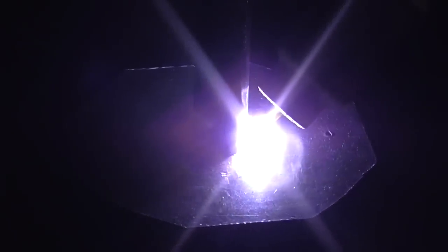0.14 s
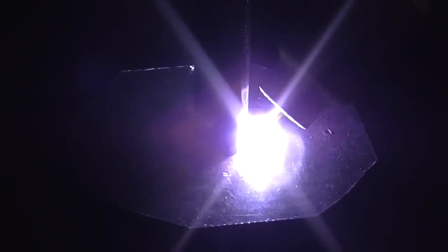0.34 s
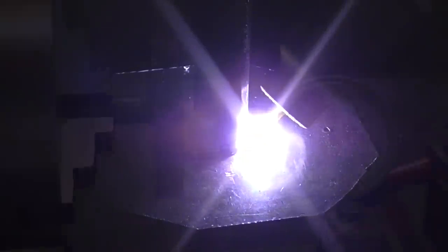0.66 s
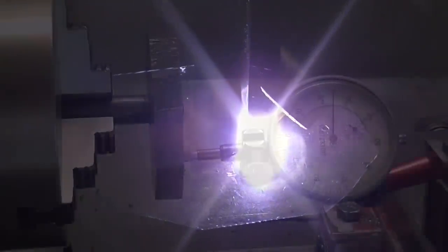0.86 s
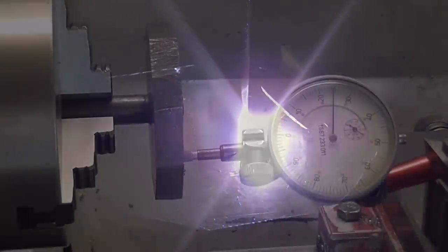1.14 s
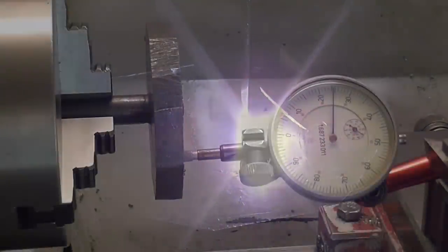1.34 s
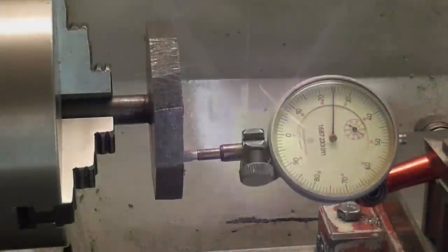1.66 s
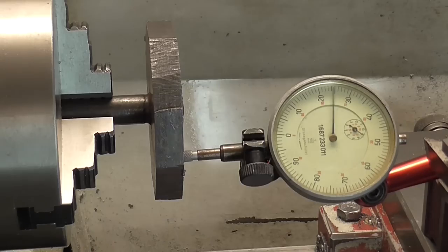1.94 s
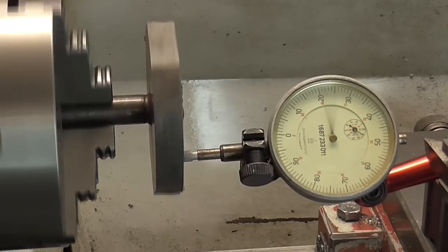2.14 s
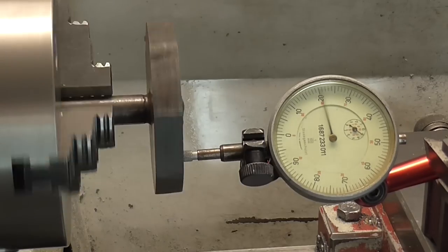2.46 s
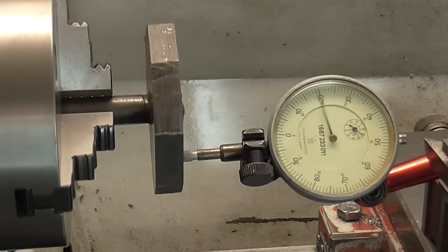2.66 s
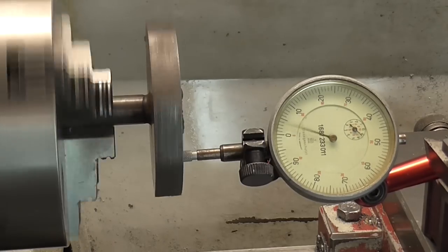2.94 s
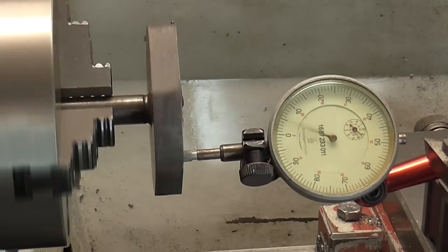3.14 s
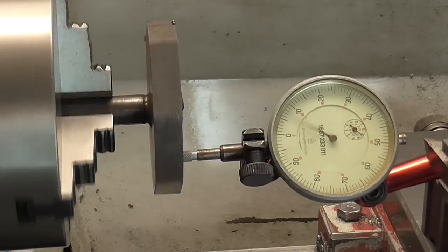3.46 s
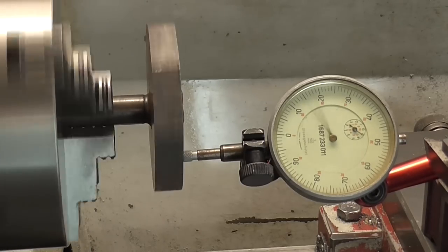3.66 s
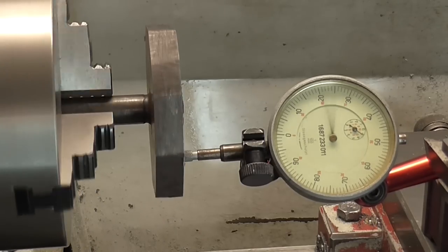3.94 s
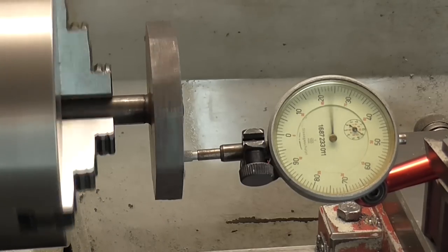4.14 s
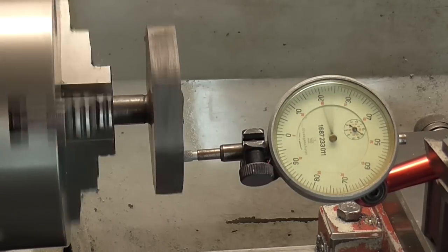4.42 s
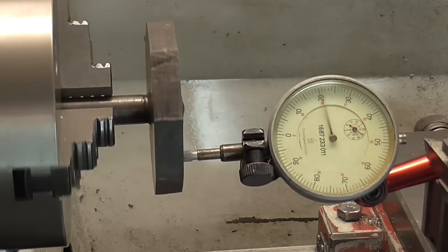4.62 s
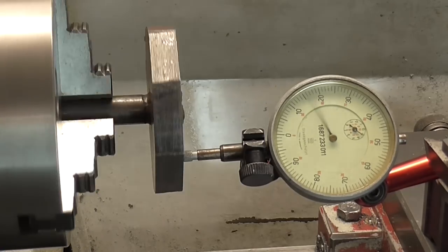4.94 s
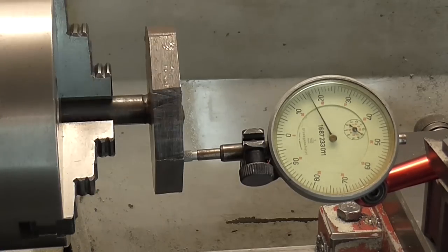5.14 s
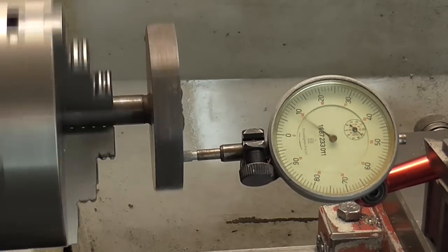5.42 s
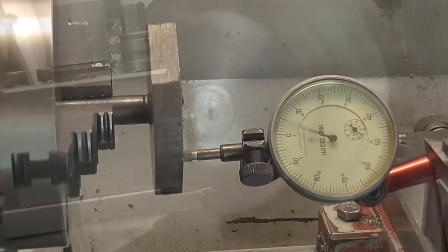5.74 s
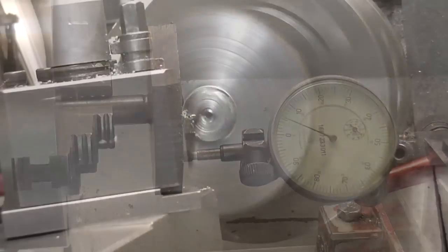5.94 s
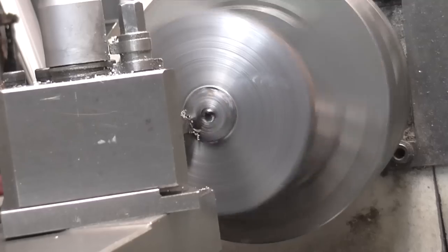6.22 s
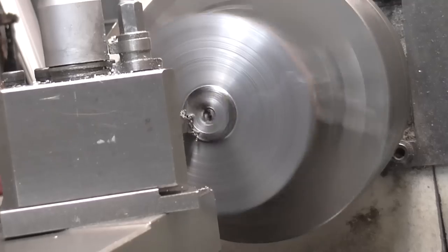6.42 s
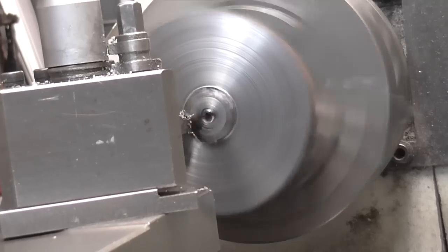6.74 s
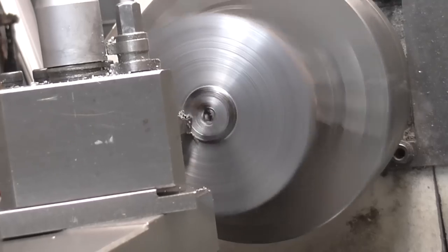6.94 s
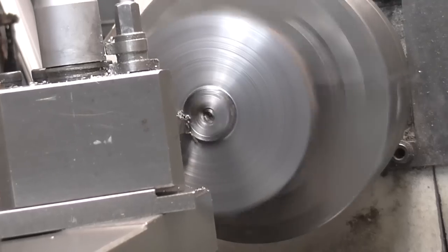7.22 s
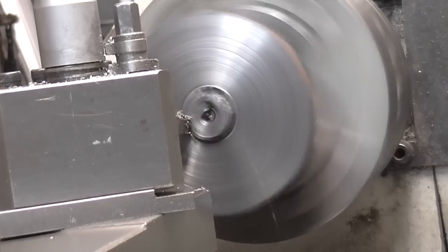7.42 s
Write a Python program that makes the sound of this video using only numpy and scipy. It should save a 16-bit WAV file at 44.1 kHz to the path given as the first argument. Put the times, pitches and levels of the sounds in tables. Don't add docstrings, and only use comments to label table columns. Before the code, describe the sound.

Close in a workshop: steady fan roar and hissing arc sink away into faint room hum. Short hand pulls on a chuck follow, each a dry toothy ratcheting with metallic ticks, rumbling bearings and faint high squeals. Finally a much louder lathe swells up facing steel, its casting throbbing irregularly, gears whining, the tool hissing, and bright chips tearing, snapping and pinging.

```python
import sys
import numpy as np
from scipy import signal
from scipy.io import wavfile
from scipy.ndimage import uniform_filter1d, map_coordinates

SR = 44100
rng = np.random.default_rng(int(sys.argv[2]) if len(sys.argv) > 2 else 0)


def pcm_store(signal):
    levels = np.round(np.clip(np.atleast_2d(signal), -1, 1) * 32767)
    wavfile.write(sys.argv[1], SR, levels.astype(np.int16).T)


def rack_gain(trim_db):
    fader = np.asarray(trim_db, float)
    return 10 ** (fader / 20)


N = 334278

# pitch in Hz, balance in dB.
HAND_PAIR = [
    [(60, 0.22), (240, 0.79), (950, 0.53), (3770, 0.92), (15000, 0.3)],
    [(60, -5), (950, -1.5), (15000, 0)],
]
LATHE_PAIR = [
    [(60, 0.25), (130, 0.96), (290, 1), (640, 0.92), (1410, 0.67), (3100, 0.71), (6820, 0.94), (15000, 0.27)],
    [(60, -0.8), (950, -1.7), (15000, -1.7)],
]
# start in seconds, length in seconds, tooth rub level in dB,
# share of the length at which the pull is hardest.
PULLS = [(2.07, 0.55, -45.5, 0.45), (2.55, 0.31, -50, 0.34), (2.79, 0.55, -45, 0.53),
         (3.24, 0.25, -52.5, 0.35), (3.54, 0.71, -43, 0.39), (4.22, 0.53, -45, 0.36),
         (4.67, 0.21, -51.5, 0.46), (4.82, 0.4, -50.5, 0.45), (5.41, 0.47, -45.5, 0.51)]
# pitch in Hz, width in Hz, level in dB.
TOOL = [(1480, 150, 0), (2010, 100, -3), (2585, 80, -5), (2800, 150, -8), (3022, 55, 0), (3280, 130, -4),
        (4850, 300, -14)]


def welder():
    # time in seconds, level in dB.
    loudness = [(0, -19), (0.195, -19.5), (0.559, -19), (1.108, -23.5), (1.312, -25.5), (1.641, -32),
                (1.726, -35), (1.806, -37.5), (1.9, -50.5)]
    pair = [
        [(60, 2.9), (240, 1.3), (950, 0.73), (3770, 0.78), (15000, 1)],
        [(60, -10), (950, 0.5), (15000, -1)],
    ]
    # pitch in Hz, level in dB per Hz.
    wash = [(29, -55), (50, -37), (103, -51), (225, -7), (506, -6.5), (550, -8), (670, -5.5), (948, -14.5),
            (1390, -12.5), (2600, -28), (3380, -89), (5720, -120)]
    # pitch in Hz, width in Hz, level in dB.
    case = [(185.5, 52, -1.5), (280, 14, -3), (381, 72, 1.5), (496.7, 23, -3), (657, 29, -9),
            (1483, 42, -16)]
    # multiple of the blade rate, level in dB against the roar.
    blades = [(1, -7.5), (3, -15), (5, -19), (6, -21.5), (7, -26)]
    # multiple of the shaft rate, level in dB against the roar.
    shaft = [(1, -28), (2, -34), (3, -32)]
    # pitch in Hz, level in dB per Hz.
    arc = [(1500, -28), (2600, -4), (4800, -0.5), (7700, -6), (8600, -14), (9700, -12), (10500, -19),
           (11300, -13), (13000, -16), (15600, -24)]
    blade_hz, shaft_hz = 226.7, 44.3

    gate, (level_db,) = curves(loudness)
    roar = rack_gain(-5.0) * noise(pair, wash) + rack_gain(-5.5) * noise(pair, modes=case)
    lines = sum(rack_gain(db) * tone(k * blade_hz, 0.00216, 2.26) for k, db in blades)
    lines = lines + sum(rack_gain(db) * tone(k * shaft_hz, 0.0062, 0.83) for k, db in shaft)
    hiss = rack_gain(-17.5) * noise(pair, arc)
    return gate * rack_gain(level_db) * (roar + lines + hiss)


def hand_pulls():
    # start in seconds, length in seconds, bearing rumble in dB.
    spins = [
        (2.057, 3.3, -47.5),
        (5.39, 0.44, -48.5),
    ]
    rise_s, fall_s, rest_db = 0.06, 0.1, -62
    spin = held([(s, length, rack_gain(db)) for s, length, db in spins], rise_s, fall_s)
    coasting = held([(s, length, 1) for s, length, _ in spins], rise_s, fall_s)
    effort = swells(PULLS, 1.4) + rack_gain(rest_db) * coasting
    push = (effort / rack_gain(-38.5) + 0.016) ** 0.13
    return gear_rub(effort) + spin * push * bearing_rumble() + tooth_ticks()


def gear_rub(effort):
    # pitch in Hz, width in Hz, level in dB.
    gearbox = [(1764, 720, 3.5), (2040, 12, -2.5), (2330, 160, -1), (3315, 53, -5), (3780, 140, -2),
               (4150, 310, -2), (4900, 150, -2.5), (5470, 150, -12), (2740, 2300, 2)]
    # pitch in Hz, level in dB per Hz.
    scrape_colour = [(1200, -6), (3000, -3), (5500, 5), (7400, -3.5), (8600, -8), (10800, -5), (11600, -8),
                     (12500, -26), (15600, -34)]
    # start in seconds, length in seconds, scrape level in dB.
    drags = [(2.3, 0.12, -78), (2.62, 0.15, -69), (3.27, 0.12, -64), (3.85, 0.16, -63), (4.0, 0.14, -68),
             (4.22, 0.09, -69), (4.98, 0.35, -67), (5.55, 0.13, -74)]
    # start in seconds, shift as a share of a tooth.
    tooth_place = [(0, .36), (2.55, .02), (3.5, .42), (3.99, .8), (4.2, .48), (4.58, .15), (4.9, .2),
                   (5.35, .95)]
    # start in seconds, length in seconds, level in dB,
    # share of the length at which it is hardest.
    shrill = [
        (2.8, .44, -51, .55),
        (3.62, .38, -50, .5),
        (2.58, .1, -55, .5),
    ]
    # pitch in Hz, width in Hz, level in dB.
    shrill_ring = [(3820, 100, -1), (4220, 280, -1)]
    teeth_per_s = 78.9

    t = np.arange(N) / SR
    since, place = np.transpose(tooth_place)
    shift = place[np.searchsorted(since, t, "right") - 1]
    cycle = (t * teeth_per_s - shift) % 1
    contact = np.exp(-cycle / 0.83) * rack_gain(2.5 * drift(48))
    rub = evened(1.9 + contact ** 2.6) * noise(HAND_PAIR, modes=gearbox, steep=1.7)
    scrape = evened(0.72 + contact ** 2.9) * noise(HAND_PAIR, scrape_colour)
    scrape = scrape + rack_gain(-2) * flank_ticks(cycle)
    drag = rack_gain(-16.5) * effort + swells(drags, 0.8)
    ringing = swells(shrill, 0.64) * evened(.5 + contact) * noise(HAND_PAIR, modes=shrill_ring)
    return rack_gain(-3.0) * effort * rub + rack_gain(4.5) * drag * scrape + ringing


def flank_ticks(cycle):
    # pitch in Hz, width in Hz, level in dB.
    flank = [(1760, 330, 2), (4780, 200, -2), (5830, 370, 0), (7050, 280, -10), (11600, 450, -16)]
    t = np.arange(900) / SR
    ring = sum(rack_gain(db) * np.exp(-np.pi * w * t) * np.sin(2 * np.pi * f * t) for f, w, db in flank)
    passing = np.diff(cycle, prepend=0) < -.5
    hits = passing * rack_gain(-5.5 * rng.standard_normal(N))
    return evened(signal.oaconvolve(hits, ring)[:N]) * rack_gain(np.array([[.5], [-.5]]))


def bearing_rumble():
    # pitch in Hz, width in Hz, level in dB.
    rumble_rings = [(241, 61, -11), (335.5, 90, -1), (458, 77, -5.5), (592, 78, -2.5), (708, 190, 1),
                    (1010, 1600, -8)]
    # pitch in Hz, level in dB against the rumble.
    housing = [(322, -13.5), (625, -11.5)]
    # pitch in Hz, start in seconds, length in seconds, level in dB.
    hums = [(478, 2.7, 0.16, -3), (705, 3.88, 0.22, -4), (620, 4.24, 0.23, -3), (478, 3.38, .18, -5),
            (615, 4.07, .09, -3), (470, 4.1, .12, -5), (320, 5.05, .13, -3), (760, 5.15, .14, -6)]
    rumble = noise(HAND_PAIR, modes=rumble_rings, patchy_db=-1.5) * rack_gain(1.7 * drift(7.8))
    rumble = rumble + rack_gain(-11) * tone(234, .003, .8)
    rumble = rumble + sum(rack_gain(db) * tone(hz, 0.01253, 5.3) for hz, db in housing)
    return rumble + sum(swells([row], 0.46) * tone(hz, 0.00402, 1.1) for hz, *row in hums)


def tooth_ticks():
    # time in
    # seconds, peak in dB, low ring in dB against the high ring.
    ticks = [(2.1038, -38, -13), (2.1297, -43, -5), (2.207, -40, 1), (2.231, -37, -9), (2.2569, -33.5, -7),
             (2.2814, -33, -11), (2.3068, -31.5, -11), (2.3647, -31.5, -7.5), (2.4939, -39, -10),
             (2.567, -47, -4), (2.6206, -43, -11), (2.8092, -45, -12), (2.8476, -43, -6), (2.9374, -43, -5),
             (2.9763, -38, -7), (3.015, -41, -11), (3.1349, -43, -2), (3.1664, -40, -5), (3.192, -33.5, -6),
             (3.5785, -43.5, -3), (3.604, -40, -4.5), (3.6298, -30, -6), (3.6554, -31, -6.5),
             (3.682, -25, -11), (3.7066, -27, -9), (3.732, -32, -9), (3.758, -26, -11), (3.8074, -33, -6),
             (3.833, -27, -10), (3.858, -37, -7), (3.8832, -30, -11), (3.9092, -25, -9),
             (3.9358, -25.5, -9), (3.9601, -34, -2), (4.0284, -41, 1), (4.2623, -39, -9),
             (4.2873, -38, -10), (4.3133, -32.5, -9), (4.337, -38, -7), (4.3636, -38, -6),
             (4.3895, -30, -10), (4.414, -36, -11), (4.4385, -39, -12), (4.4639, -34, -20),
             (4.4892, -35, -11), (4.5143, -33, -10), (4.5647, -36.5, -18), (4.7029, -38, -8),
             (4.7528, -37.5, -14), (4.7777, -45, -11), (4.9169, -44, -16), (5.0314, -37, -9),
             (5.057, -43, -4), (5.538, -45, -7), (5.5594, -43, -5), (5.5978, -38, -7), (5.6487, -38, -11),
             (5.7121, -46, -1),
             (2.3534, -41, -15), (2.3945, -37, -11), (2.4518, -45, -2), (2.5296, -44, -2),
              (2.6334, -38, -11), (2.6454, -39, -11), (3.0445, -37, -7), (3.0654, -40, -8),
              (3.0794, -39, -11), (3.1154, -40, -2), (3.2934, -47, 4), (3.3174, -43, 4), (3.9844, -48, 5),
              (4.0113, -42, 0), (4.0364, -44, 2), (4.0604, -44, 3), (4.9297, -41, -12)]
    # pitch in Hz, width in Hz, level in dB.
    tooth = [(2070, 80, -3), (2230, 170, 0), (3810, 90, -9), (4150, 140, -2), (4340, 150, 0),
             (4900, 200, -14), (5700, 300, -19)]
    lead_s = .0014
    events = [(s - lead_s, db, low + 3, -19) for s, db, low in ticks]
    return rack_gain(0.5) * knocks(events, tooth, 2900, 0.0045, 0.4, 6100, rattle=0.84)


def squeak():
    # time in seconds, pitch in Hz, level in dB.
    slip = [
        (3.608, 3420, -58),
        (3.622, 3710, -37),
        (3.68, 3400, -57),
    ]
    gate, (hz, level_db) = curves(slip)
    grain = evened(uniform_filter1d(rng.standard_normal(N), size=90))
    return gate * rack_gain(level_db) * grain * tone(hz, 0.00393)


def hand_squeals():
    # start in seconds, length in seconds, level in dB.
    lines = [
        [(2.355, .05, -62), (2.41, .07, -67), (2.87, .09, -69), (3.0, .14, -65), (3.14, .22, -72), (3.6, 0.087, -60), (3.72, .08, -64), (3.88, 0.11, -54), (4.04, .12, -73), (4.34, .2, -71), (5.52, 0.17, -70)],
        [(4.58, 0.28, -79), (2.12, 0.074, -75), (2.26, .09, -66), (2.35, 0.074, -68), (2.53, 0.11, -68), (2.87, .14, -66), (3.05, 0.088, -64), (3.14, 0.13, -69), (3.73, 0.11, -60), (3.8, .13, -62), (3.97, 0.11, -62), (4.24, .09, -73), (4.36, 0.1, -63), (4.95, .1, -74), (5.57, 0.13, -65)],
    ]
    pitches_hz = (9835, 10175)
    # start in seconds, length in seconds, level in dB.
    pips = [
        (3.71, .03, -62),
        (4.39, .04, -60),
    ]
    links = rack_gain(-32) * swells(PULLS, .6)
    return squeals(lines, pitches_hz, links) + swells(pips) * tone(9450, .003)


def cut_squeals():
    # start in seconds, length in seconds, level in dB.
    lines = [
        [(5.9, 1.6, -70), (6.4, .11, -58), (6.54, 0.093, -57), (6.77, 0.057, -56), (6.91, 0.12, -46), (7.11, 0.12, -52), (7.4, .07, -57), (7.48, 0.06, -57)],
        [(5.9, 1.4, -63), (6.51, 0.12, -54), (7.24, 0.056, -55), (7.49, .1, -63)],
    ]
    pitches_hz = (9646, 9975)
    return squeals(lines, pitches_hz)


def squeals(tables, pitches_hz, links=0):
    flickers = [(swells(rows, 1.4) + links) * rack_gain(2 * drift(30)) for rows in tables]
    return sum(flicker * tone(hz, 0.00051) for hz, flicker in zip(pitches_hz, flickers))


def lathe():
    # start in seconds, length in seconds, surge in dB over the steady cut.
    surges = [(5.755, 0.021, 10), (5.875, 0.048, 6.5), (5.95, 0.042, 5.5), (6.01, 0.04, 5.5),
              (6.148, 0.042, 7), (6.24, 0.076, 7), (6.33, 0.051, 1.5), (6.385, 0.11, 5.5),
              (6.485, 0.036, 5), (6.517, 0.065, 4.5), (6.603, 0.052, 6.5), (6.66, 0.043, 4.5),
              (6.71, 0.089, 4.5), (6.915, 0.052, 6), (6.985, 0.089, 3.5), (7.06, 0.032, 8.5),
              (7.132, 0.03, 6.5), (7.175, 0.012, 20), (7.228, 0.058, 4), (7.388, 0.069, 6.5),
              (7.5, .06, 2.5), (7.56, 0.038, 0.5)]
    # start in seconds, length in seconds, level in dB.
    hard_spot = [
        (6.83, 0.17, 1.5),
    ]
    # pitch in Hz, level in dB per Hz.
    roar_colour = [(70, -57), (110, -36), (200, -9.5), (760, -8), (1460, -7.5), (2050, -16), (2300, -25),
                   (3000, -23.5), (5000, -78)]
    # pitch in Hz, width in Hz, level in dB.
    roar_rings = [(940, 50, -5), (1460, 220, -1), (2010, 70, -7)]
    # pitch in Hz, level in dB per Hz.
    hiss_colour = [(1290, -16), (2200, -24), (2770, -1), (3000, 0.5), (3510, 0.5), (4000, 0), (5070, 3.5),
                   (5540, -1), (9660, -5), (12500, -9.5), (15500, -28)]
    # pitch in Hz, level in dB.
    whine_tones = [(468, -29), (868, -39.5), (921, -39), (947, -43.5), (1045, -48), (1147, -44),
                   (1248, -37.5)]
    start_s, full_s = 5.693, 6.114

    fade = np.clip((np.arange(N) / SR - start_s) / (full_s - start_s), 0, 1) ** 1.08
    bite_db = held(surges, 0.0043, 0.02)
    chips = evened(2.0 + crackle(110, .003, 2.0)) * rack_gain(held(hard_spot, 0.02, 0.033))
    roar = rack_gain(2) * noise(LATHE_PAIR, roar_colour) + rack_gain(-4.5) * noise(LATHE_PAIR, modes=roar_rings)
    hiss = rack_gain(-38.5 + 0.2 * bite_db) * chips * noise(LATHE_PAIR, hiss_colour)
    whine = sum(rack_gain(db) * tone(hz, 0.00127, 2.5) for hz, db in whine_tones)
    whine = whine + rack_gain(-44) * tone(99.6, .001, 1.0)
    body = casting_drone(bite_db) + rack_gain(-27 + 0.24 * bite_db) * chips ** 1.09 * roar
    low_cut = signal.butter(4, 85, "high", fs=SR, output="sos")
    body = signal.sosfilt(low_cut, body)
    return fade * (body + hiss + whine) + rack_gain(-3.5) * chip_tears() + chip_clanks()


def casting_drone(bite_db):
    # pitch in Hz, width in Hz, level in dB.
    bed_ring = [(345, 26, 0)]
    casting = [(183.4, 16.3, -5.5), (245.7, 15, 0.5), (401.3, 13.2, -3.5), (464, 8.6, -4.5), (556, 24, -13),
               (664, 64, -4.5)]
    upper_ring = [(668, 22.3, 0)]
    # start in seconds, length in seconds, dB over its steady ring.
    answers = [(6.08, 0.058, 5.5), (6.19, 0.073, 1), (6.36, 0.042, 8), (6.5, 0.073, 7), (6.77, 0.054, 8.5),
               (6.93, 0.046, 7.5), (6.99, 0.033, 10), (7.06, 0.027, 17.5), (7.14, 0.059, 13),
               (7.49, 0.038, 12), (7.552, 0.046, 14)]
    bed = steadied(noise(LATHE_PAIR, modes=bed_ring, steep=2.7), 0.02, 0.71)
    rings = steadied(noise(LATHE_PAIR, modes=casting, patchy_db=2.0, steep=1.36), 0.019, 0.12)
    bell = steadied(noise(LATHE_PAIR, modes=upper_ring), 0.043, 1.0)
    drone = rack_gain(-21) * (rack_gain(1.6 * bite_db - 2.0) * bed + rack_gain(0.59 * bite_db - 0.5) * rings)
    return drone + rack_gain(-29 + held(answers, 0.0043, 0.02)) * bell


def chip_tears():
    # time in seconds, peak in dB, pitch in Hz.
    tear_list = [(5.798, -34, 4330), (5.8477, -26, 7280), (5.9163, -19.5, 7100), (5.9704, -33, 4700),
                 (6.01, -23, 5110), (6.0902, -28, 5210), (6.1301, -23, 5090), (6.161, -38, 4480),
                 (6.4099, -23, 6520), (6.4369, -22, 7440), (6.4847, -26, 4480), (6.5451, -22, 5840),
                 (6.588, -26, 4320), (6.605, -17, 6740), (6.642, -21, 6620), (6.8418, -18, 6520),
                 (6.8937, -18, 4480), (6.9387, -18, 5220), (7.045, -25, 4880), (7.0829, -36, 4720),
                 (7.1303, -39, 4530), (7.1972, -29, 4540), (7.2186, -23, 5240), (7.251, -21, 5910),
                 (7.325, -19, 5050), (7.3762, -36, 5350), (7.3892, -27, 5490), (7.4102, -31, 4470),
                 (7.4426, -25, 5190)]
    decay_s, breadth, apart = 0.0047, 0.53, 0.52
    t, out = np.arange(1600) / SR, np.zeros((2, N + 1600))
    for s, peak_db, hz in tear_list:
        puff = rng.standard_normal(1600) + apart * rng.standard_normal((2, 1600))
        puff = puff * np.minimum(t / .001, 1) * np.exp(-t / decay_s)
        ring = signal.iirpeak(hz, 1 / breadth, SR)
        puff = signal.lfilter(*ring, signal.lfilter(*ring, puff))
        at = round(s * SR)
        out[:, at:at + 1600] += rack_gain(peak_db) * puff / abs(puff).max()
    return out[:, :N]


def chip_clanks():
    # time in seconds, ping peak in dB, low ring in dB over the ping.
    clanks = [(5.8356, -37, 16), (5.8551, -36, 15), (5.9145, -25.5, 4), (5.9714, -28, 6), (6.0077, -24, 13),
              (6.0836, -30.5, 1), (6.126, -30, 9), (6.1534, -33, 17), (6.2038, -31, 12), (6.2647, -30, 15),
              (6.3021, -36, 1), (6.3235, -28, 14), (6.3644, -24.5, 12), (6.4094, -30, -1), (6.4388, -23, 8),
              (6.4867, -26, 2), (6.5231, -25, 4), (6.5604, -34, 6), (6.5864, -28, 10), (6.6044, -27, 14),
              (6.6423, -25.5, 13), (6.6744, -30, 19), (6.7231, -30, 11), (6.7724, -45, 0),
              (6.8354, -26.5, 3), (6.8838, -31, 5), (6.8944, -25.5, 22.5), (6.9042, -30, -1),
              (6.9341, -25, 15), (6.9651, -30, 9), (6.9945, -28, 15), (7.0419, -37, -10), (7.0843, -27, 0),
              (7.1417, -20, -6), (7.1761, -27, 9), (7.2, -23, 4), (7.2529, -31, 13), (7.2913, -32, 12),
              (7.3262, -18, 7), (7.3781, -33, 1), (7.415, -27, 8), (7.444, -16.5, 4), (7.5014, -32, 17),
              (7.5313, -30, 3)]
    events = [(s - .001, db - 1.0, low - 3, -12) for s, db, low in clanks]
    return knocks(events, TOOL, 2300, 0.0043, 0.44, rattle=1.0, soft_s=0.00083)


def swarf_snaps():
    # time in seconds, peak in dB.
    snaps = [(5.8727, -42), (5.953, -38), (6.0822, -38), (6.1106, -32), (6.4718, -34), (6.5456, -32),
             (6.605, -26), (6.6354, -35), (6.7596, -34), (6.9392, -30), (7.1577, -36), (7.2111, -34),
             (7.2406, -33), (7.3892, -42)]
    events = [(s, db - 19.0, 0, 20) for s, db in snaps]
    return knocks(events, TOOL, 2300, 0.0021, 0.46, 10800, rattle=3.3)


def idle_workshop():
    # pitch in Hz, level in dB per Hz.
    room = [(30, -45), (65, 5.5), (130, 1), (400, -6.5), (700, -6), (1850, -14.5), (2030, 0), (2400, -8),
            (2700, -20), (4400, -14), (8000, -17.5), (15600, -19)]
    return rack_gain(-60) * noise(HAND_PAIR, room, patchy_db=.8)


def noise(pair, spectrum=None, modes=None, patchy_db=1.5, steep=2):
    frames, hz = N // 512 + 6, np.fft.rfftfreq(2048, 1 / SR)
    a, b, c, d, patches = rng.standard_normal((frames, 1025, 5)).T
    patches = evened(uniform_filter1d(uniform_filter1d(patches, size=12, axis=0), size=4, axis=1))
    if modes is None:
        colour = rack_gain(read(spectrum, hz))
    else:
        power = sum(rack_gain(db) ** 2 / w / (1 + (2 * (hz - f) / w) ** 2) ** steep for f, w, db in modes)
        colour = np.sqrt(power) / (1 + (110 / (hz + 1)) ** 4)
    same = np.clip(read(pair[0], hz), -1, 1)[:, None]
    left = a + 1j * b
    right = same * left + np.sqrt(1 - same ** 2) * (c + 1j * d)
    lean = rack_gain(read(pair[1], hz) / 2)[:, None]
    z = np.array([left * lean, right / lean]) * colour[:, None] * rack_gain(patchy_db * patches)
    return evened(signal.istft(z, nperseg=2048, noverlap=1536)[1][:, :N])


def tone(hz, waver, wobble_db=0.5, lean_db=-1.0):
    turns = np.cumsum(hz * (1 + waver * drift(6))) / SR + rng.random()
    sides = rack_gain(np.array([[.5], [-.5]]) * lean_db)
    return np.sqrt(2) * np.sin(2 * np.pi * turns) * rack_gain(wobble_db * drift(7.9)) * sides


def knocks(events, modes, split_hz, blow_s, apart, edge_hz=7200, rattle=.25, soft_s=0.00081):
    t, out = np.arange(2600) / SR, np.zeros((2, N + 5200))
    soft_start = 1 - np.exp(-t / soft_s)
    ring = [rack_gain(db) * np.exp(-np.pi * w * t) * soft_start * np.sin(2 * np.pi * f * t) for f, w, db in modes]
    low = sum(r for r, m in zip(ring, modes) if m[0] < split_hz)
    high = sum(r for r, m in zip(ring, modes) if m[0] >= split_hz)
    edge = t * np.exp(-t * edge_hz / 1.2) * np.sin(2 * np.pi * edge_hz * t)
    for s, peak_db, low_db, edge_db in events:
        shared, own = rng.standard_normal(2600), rng.standard_normal((2, 2600))
        tail = rattle * (shared + apart * own) * np.exp(-t / blow_s) / np.sqrt(blow_s * SR)
        blow = (t == 0) + tail
        parts = [signal.fftconvolve(blow, k[None])[:, :2600] for k in (high, low, edge)]
        sound = sum(rack_gain(db) * p / abs(p).max() for p, db in zip(parts, (0, low_db, edge_db)))
        at = round(s * SR)
        out[:, at:at + 2600] += rack_gain(peak_db) * sound
    return out[:, :N] * rack_gain(np.array([[-.5], [.5]]))


def crackle(per_s, decay_s, spread_db):
    hits = (rng.random(N) < per_s / SR) * rack_gain(spread_db * np.minimum(rng.exponential(1, N), 3))
    return signal.lfilter([1], [1, -np.exp(-1 / (decay_s * SR))], hits)


def steadied(x, seconds, share):
    power = uniform_filter1d((x ** 2).mean(0), round(seconds * SR))
    return evened(x / (power + .02) ** (share / 2))


def swells(rows, flat=1.0):
    t, out = np.arange(N) / SR, np.zeros(N)
    for start, length, db, *top in rows:
        u = np.clip((t - start) / length, 0, 1)
        bend = np.log(.5) / np.log(np.clip(top[0], .1, .9)) if top else 1
        out += rack_gain(db) * abs(np.sin(np.pi * u ** bend)) ** flat
    return out


def held(rows, rise_s, fall_s):
    t, out = np.arange(N) / SR, np.zeros(N)
    for start, length, value in rows:
        ramps = np.minimum((t - start) / rise_s, (start + length - t) / fall_s)
        out += value * np.clip(ramps, 0, 1)
    return out


def curves(rows):
    s, *columns = np.transpose(rows)
    t = np.arange(N) / SR
    gate = np.clip(np.minimum(t - s[0] + 1 / SR, s[-1] - t) / .004, 0, 1)
    return gate, [np.interp(t, s, c) for c in columns]


def drift(hz):
    count = int(N / SR * hz) + 4
    return map_coordinates(rng.standard_normal(400)[:count], [np.arange(N) / SR * hz], order=3)


def read(points, hz):
    f, value = np.transpose(points)
    return np.interp(np.log(hz + 1), np.log(f + 1), value)


def evened(x):
    return x / np.sqrt(np.mean(x ** 2) + 1e-20)


def scene():
    chuck = hand_pulls() + squeak() + hand_squeals()
    cutting = lathe() + cut_squeals() + swarf_snaps()
    return welder() + chuck + cutting + idle_workshop()


def top_cut(x):
    return signal.sosfilt(signal.butter(12, 15680, fs=SR, output="sos"), x)


def record(dry):
    mix = 1.5 * np.tanh(dry / 1.5)
    return top_cut(mix)


dry = scene()
out = record(dry)
pcm_store(out)
```